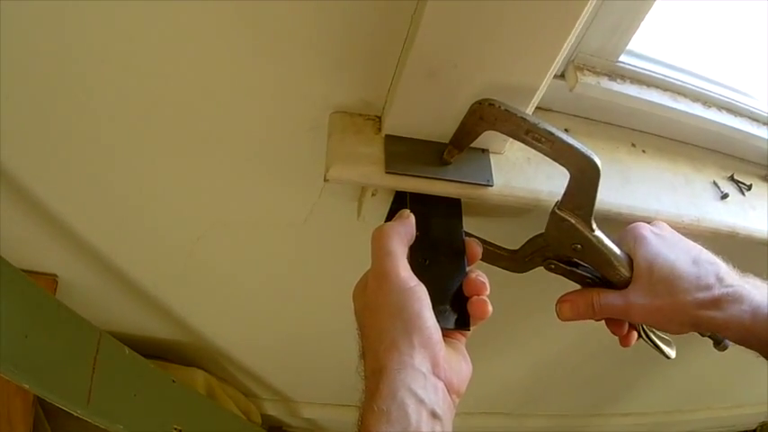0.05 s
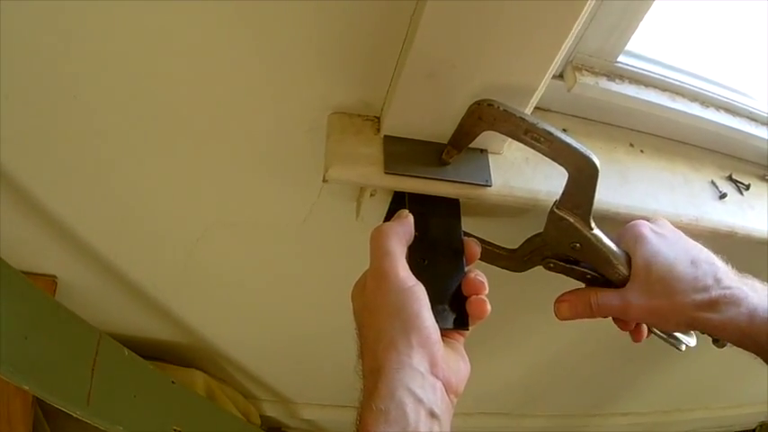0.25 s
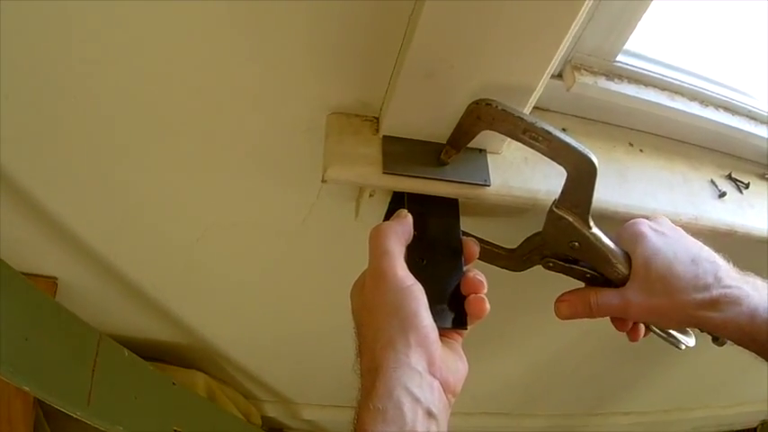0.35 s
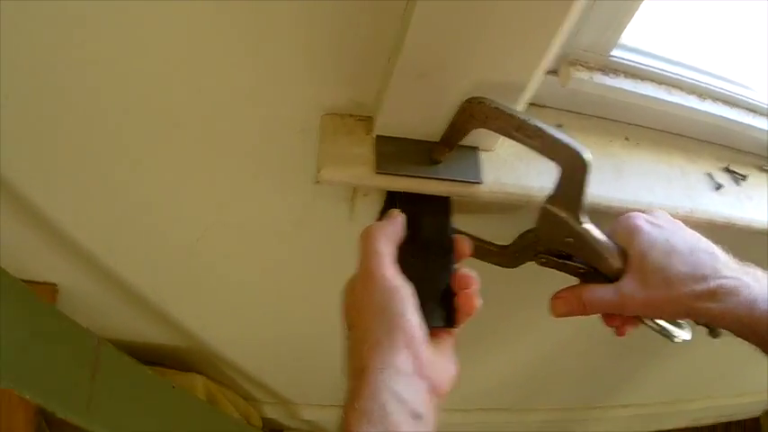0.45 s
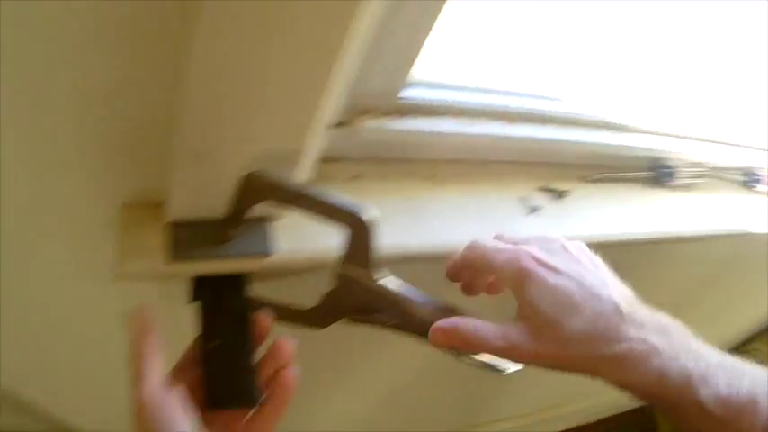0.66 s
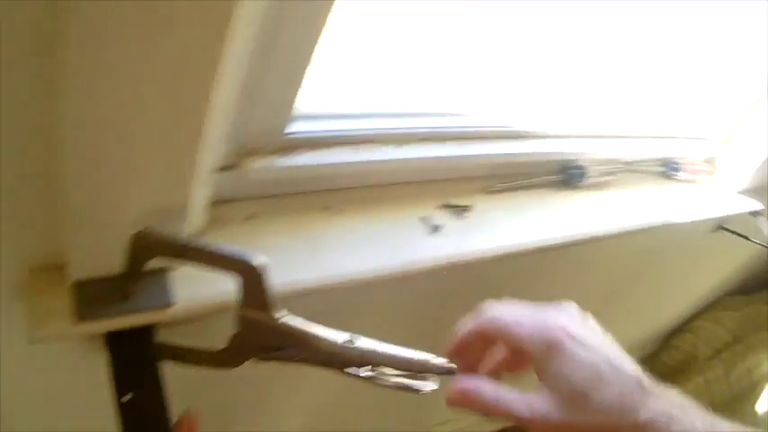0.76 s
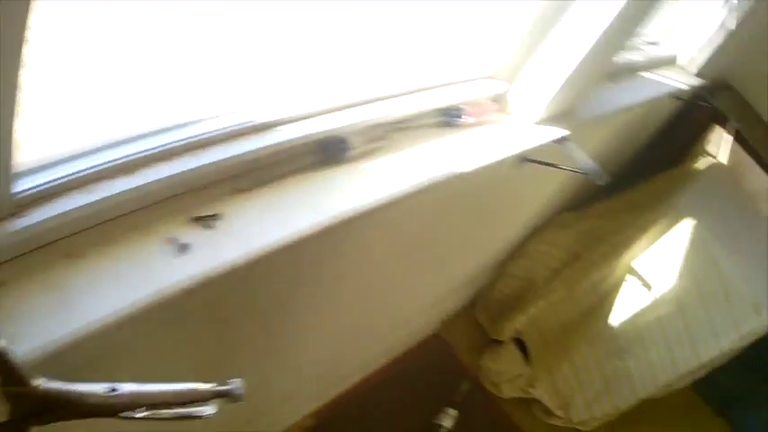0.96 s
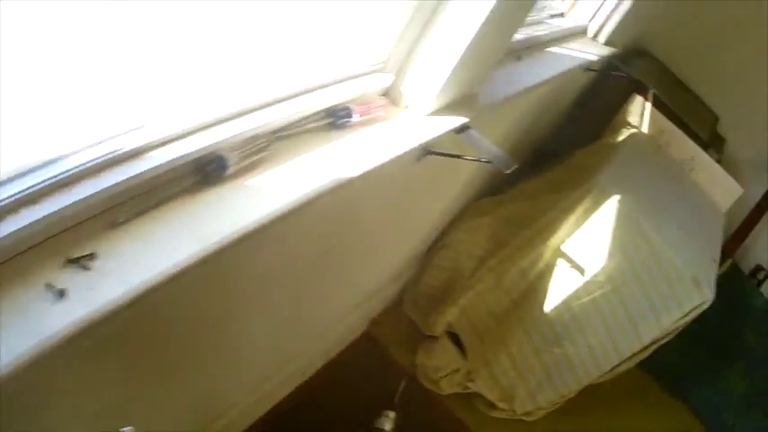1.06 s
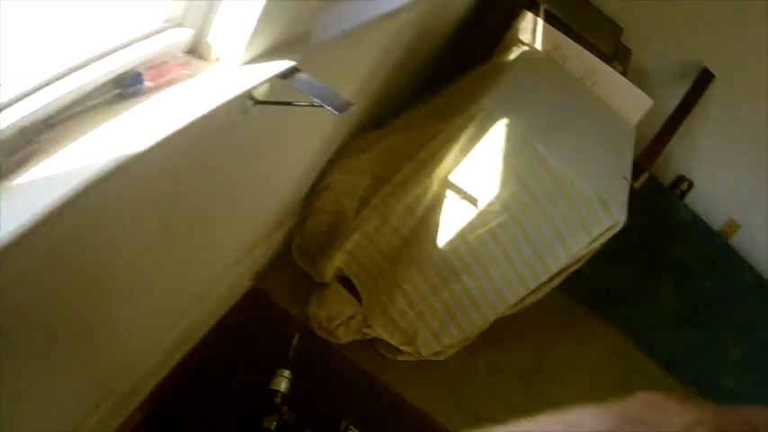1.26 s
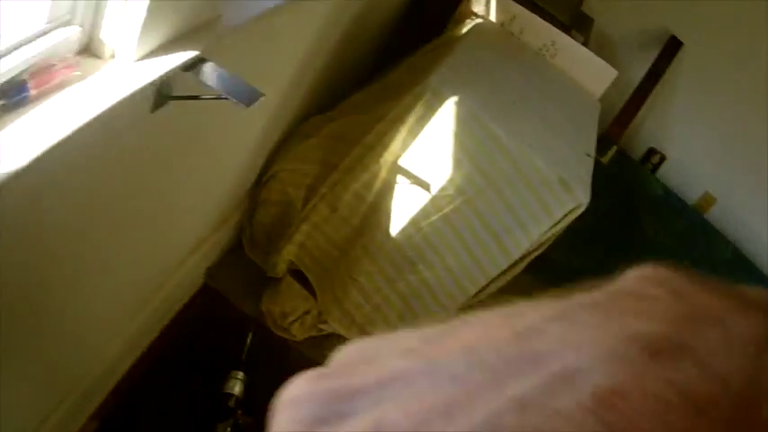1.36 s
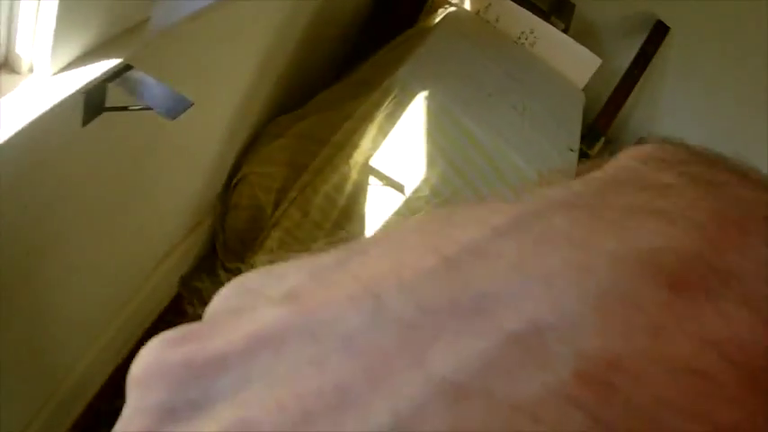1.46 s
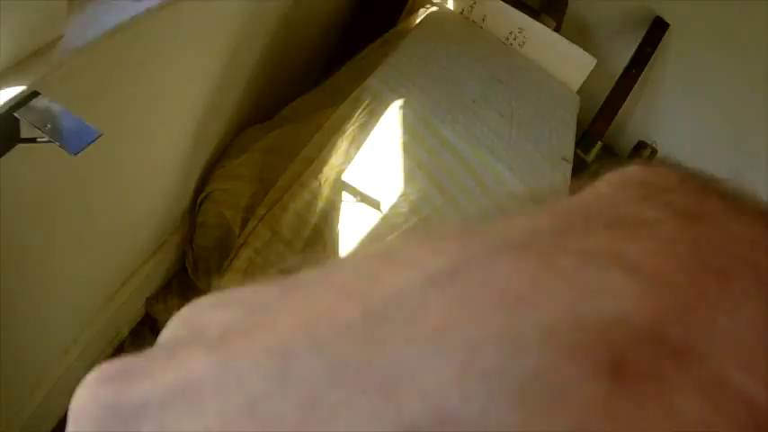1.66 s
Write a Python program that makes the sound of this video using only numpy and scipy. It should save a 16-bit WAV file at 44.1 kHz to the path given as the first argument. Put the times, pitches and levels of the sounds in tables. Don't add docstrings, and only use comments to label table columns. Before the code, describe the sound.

One hard metallic snap of clamping pliers comes early, overloading the close microphone, with a brief chatter and mid-pitched steel ring fading into room reflections; afterwards only soft handling ticks, low room air and faint traffic remain.

```python
import sys
import numpy as np
from scipy import signal
from scipy.fft import rfft, irfft, next_fast_len
from scipy.io import wavfile

SR = 44100
rng = np.random.default_rng(int(sys.argv[2]) if len(sys.argv) > 2 else 0)


def int16_out(signal):
    q = np.round(np.clip(np.atleast_2d(signal).T, -1, 1) * 32767)
    wavfile.write(sys.argv[1], SR, q.astype(np.int16))


def linear_from_db(decibels):
    return 10 ** (np.asarray(decibels, float) / 20)


N = 74970

# frequency in Hz, density in dB per Hz.
AIR_COLOUR = [(18, -26.5), (30, 0.5), (245, -9), (311, -9.5), (426, -10.5), (486, -11), (913, -15.5),
              (1430, -23), (16000, -41.5)]
# time in seconds, level in dB.
TRAFFIC_LEVEL = [(0, -60), (.04, -60), (.1, -62), (.22, -61.5), (.7, -61.5), (.8, -72.5), (.95, -65),
                 (1.15, -72.5), (1.35, -71), (1.62, -64.5), (1.7, -64)]
# time in seconds, level in dB.
SWAY_LEVEL = [(0, -104), (.5, -66.5), (.9, -57), (1.05, -77), (1.23, -61), (1.33, -46), (1.45, -48.5),
              (1.6, -55.5), (1.7, -71)]
# start in seconds, level in dB, centre in Hz, width in Hz, T60 in seconds.
SMALL_TICKS = [(.2340, -37, 2350, 500, .02), (.2338, -47, 5300, 2000, .06), (.2340, -56, 11000, 4000, .03),
               (.555, -63, 2320, 250, .06), (.622, -64, 2350, 250, .06), (.670, -61, 2250, 600, .04),
               (.7265, -54, 700, 800, .012), (.922, -64, 3000, 2500, .03), (1.2176, -63, 1500, 1500, .03),
               (1.27, -65, 2600, 1200, .04), (1.470, -50, 430, 100, .06), (1.509, -53, 2120, 300, .04),
               (1.507, -54, 1500, 1800, .03), (1.602, -58, 1060, 200, .05), (1.594, -63, 2900, 2800, .12)]
# frequency in Hz, T60 in seconds.
ROOM_T60 = [(150, .3), (400, 0.53), (1100, 0.54), (2500, 0.44), (4500, 0.51), (7000, .3), (14000, 0.25)]
# frequency in Hz, gain in dB.
WALL_COLOUR = [(150, 1.1), (1000, 3.6), (2000, -2), (5000, -4), (8500, -11.5), (11000, -11), (16000, -15.5)]
# frequency in
# Hz, level in dB, T60 in seconds.
STEEL_MODES = [(330.3, -21, 0.39), (482.3, -12, 0.33), (1167.4, 1.5, 0.44), (2037, -17.5, 0.59),
               (2100, -10.5, 0.29), (2593, -2, 0.17), (2675, -14, 0.33), (3103, -21, 0.48),
               (3930, -14, 0.36), (3840, -29, 0.41), (4290, -10, 0.12), (5163, -19, 0.28),
               (7700, -31, 0.17),
               (298.6, -18, 0.64), (556.5, -17.5, 0.51), (755, -17.5, 0.54), (927, -16.5, .4),
             (972, -8, 0.58), (1018, -11, .45), (1072, -15.5, .45), (1141.6, -3, 0.38), (1192, -2.5, 0.57),
             (1202, -12, 0.54), (1270, -12, 0.542), (1307, -17, 0.78), (1340, -17, 0.43), (1770, -15.5, .4)]
# frequency in Hz, width in Hz, level in dB.
BODY_MODES = [(311, 47, 1), (538, 125, -11.5), (770, 140, -11.5), (992, 121.5, -6.5), (1157, 41, 6.5),
              (1800, 350, -11.5), (2018, 250, -9), (2285, 220, -3.5), (2625, 200, -3.5), (3494, 530, -6.5),
              (4360, 570, -6.5), (5283, 300, -12.5), (5840, 1200, -29), (8380, 500, -21)]
# frequency in Hz, level in dB.
CRACK_COLOUR = [(100, -54), (500, -13.5), (2000, 5), (5000, -14), (9000, -12), (12000, -15.5), (16000, -23)]
CONTACT_TIMES_S = [
    .2346,
    .2459,
    .2468,
    .2690,
    .3040,
]
# blow in dB, crack in dB.
CONTACT_LEVELS = [
    (-44.5, -36),
    (-28.5, -25.5),
    (-9.5, -16),
    (-28, -31),
    (-23, -23),
]


def unit(x):
    return x / np.sqrt(np.mean(x ** 2) + 1e-20)


def along(points, hz):
    f, v = np.transpose(points)
    return np.interp(np.log(hz + 1), np.log(f + 1), v)


def gain(rows):
    s, db = np.transpose(rows)
    return linear_from_db(np.interp(np.arange(N) / SR, s, db))


def filtered(x, response):
    m = next_fast_len(N + SR // 2)
    spectrum = rfft(x, m) * response(np.fft.rfftfreq(m, 1 / SR))
    return irfft(spectrum, m)[:N]


def peak(f, hz, width_hz):
    return 1j * f * width_hz / (hz * hz - f * f + 1j * f * width_hz + 1e-9)


def noise(response):
    return unit(filtered(rng.standard_normal(N), response))


def since(s):
    return np.maximum(np.arange(N) / SR - s, 0)


def room_air():
    air_db = -58.5
    return linear_from_db(air_db) * noise(lambda f: linear_from_db(along(AIR_COLOUR, f)) * (f > 25))


def traffic():
    centre_hz, width_hz = 1000, 590
    return gain(TRAFFIC_LEVEL) * noise(lambda f: peak(f, centre_hz, width_hz) ** 2)


def camera_sway():
    sway_hz, bump_hz, bump_width_hz, bump_db = 15, 45, 40, -16
    sway = np.sin(2 * np.pi * sway_hz * np.arange(N) / SR)
    bumps = noise(lambda f: peak(f, bump_hz, bump_width_hz))
    return gain(SWAY_LEVEL) * (sway + linear_from_db(bump_db) * bumps)


def small_ticks():
    rise_s = 0.0026
    out = np.zeros(N)
    for s, db, hz, width_hz, t60_s in SMALL_TICKS:
        t = since(s)
        envelope = linear_from_db(db - 60 * t / t60_s) * (1 - np.exp(-t / rise_s))
        out += envelope * noise(lambda f: peak(f, hz, width_hz) ** 2)
    return out


def room_answer(x):
    room_db, build_up_s = -5.5, 0.0054
    hz, t, z = signal.stft(rng.standard_normal(SR), SR, nperseg=256)
    tail_db = along(WALL_COLOUR, hz)[:, None] - 60 * t / along(ROOM_T60, hz)[:, None]
    tail = signal.istft(z * linear_from_db(tail_db), SR, nperseg=256)[1]
    tail = tail * (1 - np.exp(-np.arange(len(tail)) / SR / build_up_s))
    return linear_from_db(room_db) * signal.fftconvolve(x, tail / np.linalg.norm(tail))[:N]


def steel_ring():
    slam_s, ring_db, rise_s = 0.2465, -22, 0.0013
    handle_hz, handle_db, handle_t60_s = 907, -58, 4.6
    t = since(slam_s)
    ring = np.zeros(N)
    for hz, db, t60_s in STEEL_MODES:
        ring += linear_from_db(ring_db + db - 60 * t / t60_s) * np.sin(2 * np.pi * hz * t)
    hum = linear_from_db(handle_db - 60 * t / handle_t60_s) * np.sin(2 * np.pi * handle_hz * t)
    return (ring + hum) * (1 - np.exp(-t / rise_s))


def joint_chatter():
    start_s, hold_s, t60_s = 0.2472, 0.011, 0.015
    return (since(start_s) > 0) * linear_from_db(-60 * since(start_s + hold_s) / t60_s)


def body_response(f):
    low_cut_hz = 200
    modes = 0
    for k, (hz, width_hz, db) in enumerate(BODY_MODES):
        modes = modes + (-1) ** k * linear_from_db(db) * peak(f, hz, width_hz)
    return modes * (1j * f / (low_cut_hz + 1j * f)) ** 2


def lever_snap():
    chatter_blow_db, chatter_grit_db = -4, -22
    crack_rise_s, crack_t60_s = 0.00028, 0.0069
    impulse_db = 29
    grit = noise(lambda f: linear_from_db(along(CRACK_COLOUR, f)))
    chatter = joint_chatter()
    blows = linear_from_db(chatter_blow_db) * chatter * rng.standard_normal(N)
    cracks = linear_from_db(chatter_grit_db) * chatter * grit
    for s, (blow_db, crack_db) in zip(CONTACT_TIMES_S, CONTACT_LEVELS):
        t = since(s)
        blows[round(s * SR)] += linear_from_db(blow_db + impulse_db)
        cracks += linear_from_db(crack_db - 60 * t / crack_t60_s) * (1 - np.exp(-t / crack_rise_s)) * grit
    return cracks + filtered(blows, body_response)


def scene():
    snap = lever_snap()
    pliers = snap + steel_ring() + room_answer(snap)
    ticks = small_ticks()
    background = room_air() + traffic() + camera_sway()
    return (pliers + ticks + background)[None]


def roll_off(x):
    return signal.sosfilt(signal.butter(12, 16500, fs=SR, output="sos"), x)


def record(dry):
    clip, hardness, top_hz = 0.24, 8, 16000
    clipped = dry[0] / (1 + np.abs(dry[0] / clip) ** hardness) ** (1 / hardness)
    mix = filtered(clipped, lambda f: f < top_hz)[None]
    return roll_off(mix)


dry = scene()
out = record(dry)
int16_out(out)
```